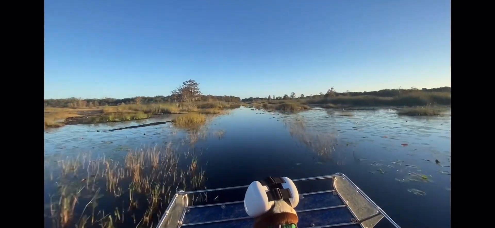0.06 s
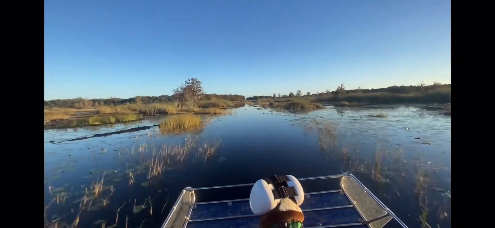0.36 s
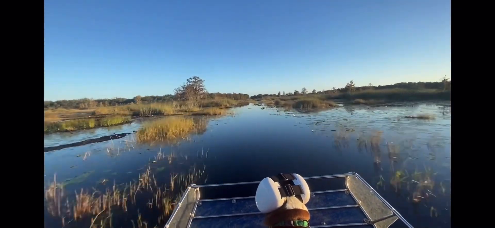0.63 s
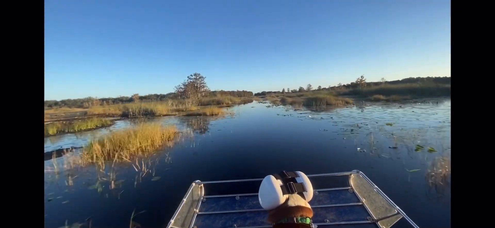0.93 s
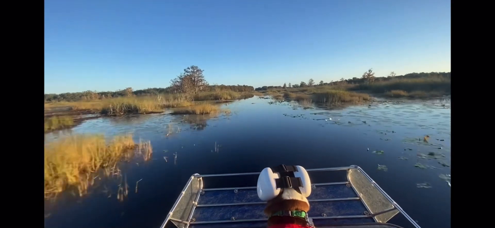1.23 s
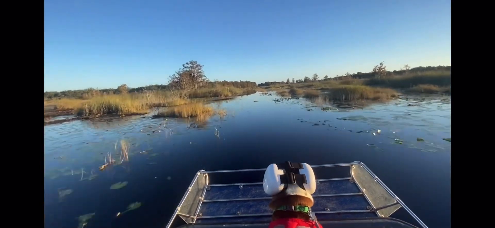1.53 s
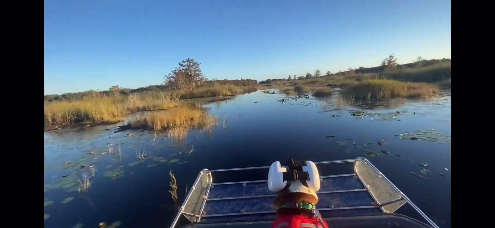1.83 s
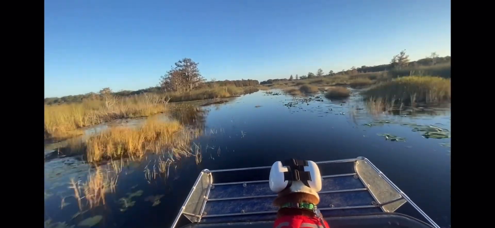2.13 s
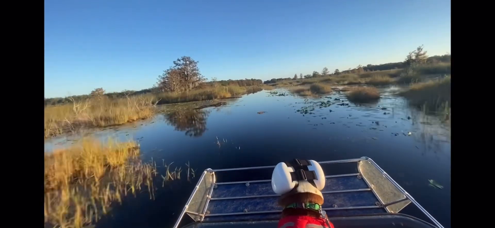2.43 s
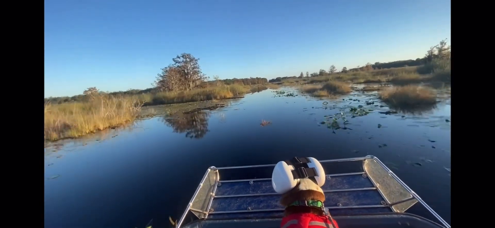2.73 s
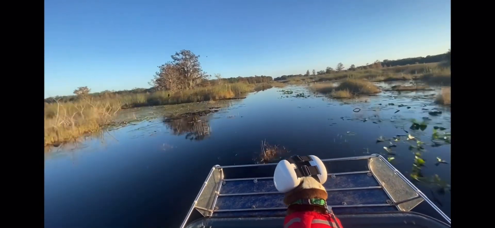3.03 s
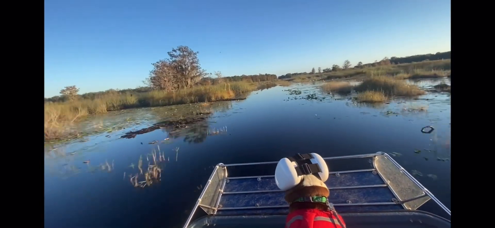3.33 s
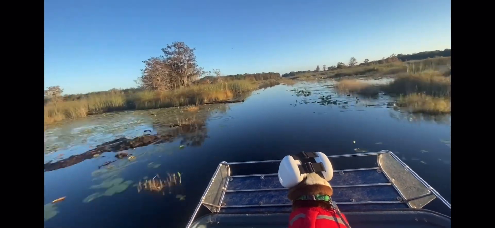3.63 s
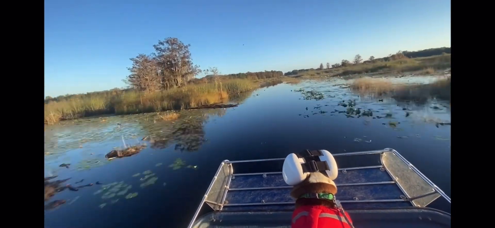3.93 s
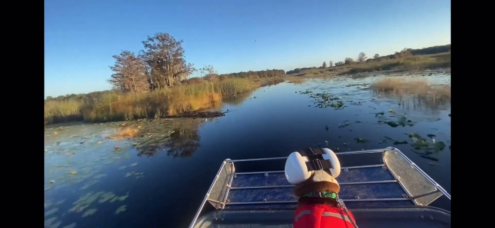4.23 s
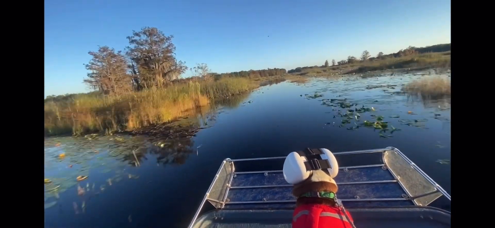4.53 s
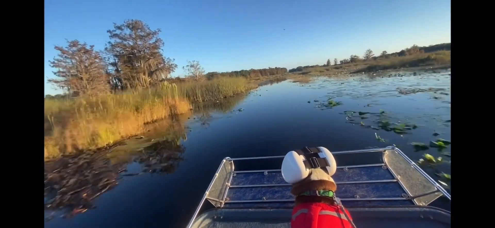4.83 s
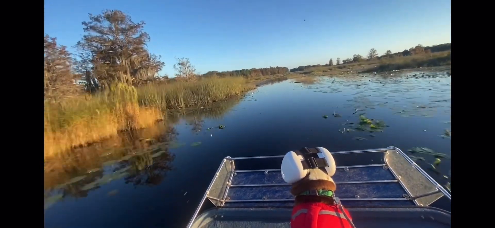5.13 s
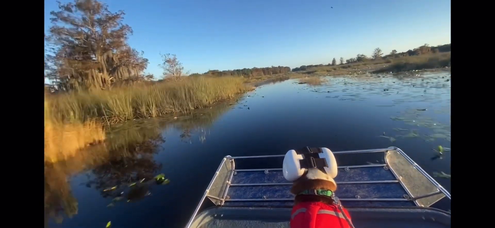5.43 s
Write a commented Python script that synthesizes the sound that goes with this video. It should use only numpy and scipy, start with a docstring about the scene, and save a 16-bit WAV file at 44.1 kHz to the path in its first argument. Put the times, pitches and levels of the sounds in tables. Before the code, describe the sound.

An airboat is already cruising over marsh water, heard close up from a seat on board. Its six-cylinder engine makes a loud, low, steady drone, with a rough growl and bark from open exhaust pipes above it. The propeller adds a pulsing roar of churned air and a faint high hiss of blade tips and spray. From the start until about 1 second, reeds brush along the hull with a light swish, then fade as the boat reaches open water. The engine runs on without a break, its pitch creeping up very slightly between about 0.7 and 4.8 seconds. The exhaust throbs unevenly, with small, brief surges around 1.5, 4.2 and 5 seconds. The overall loudness stays nearly constant, and the engine and propeller are still going at the end, at about 5.6 seconds.

```python
"""A six-cylinder engine drones and barks through open pipes while reeds brush along a hull:
an airboat cruising over marsh water, heard from a seat on board. The reeds fall away after
the first second; the throttle creeps up. The propeller's wash blurs the engine's upper
harmonics and adds a pulsing roar and a hiss."""
import sys
import numpy as np
from scipy import signal
from scipy.fft import rfft, irfft
from scipy.io import wavfile

SR = 44100
rng = np.random.default_rng(int(sys.argv[2]) if len(sys.argv) > 2 else 0)


def digitize_waveform(pressure):
    """Quantize a signal to 16-bit integers and store it at the path in sys.argv[1].

    Rows of a 2-D input are taken as channels; values are limited to [-1, 1].
    """
    field = np.atleast_2d(pressure).T
    bounded = np.clip(field, -1, 1)
    quanta = np.round(bounded * 32767).astype(np.int16)
    wavfile.write(sys.argv[1], SR, quanta)


N = 245637
TIME_S = np.arange(N) / SR
FREQ_HZ = np.fft.rfftfreq(N, 1 / SR)
CYLINDERS = 6
SKEW_RAD = 2.2  # common phase of the low lines: lopsided pressure pulses
GROWL_TOP_HZ, BARK_TOP_HZ = 700, 1050  # bands, low to high: growl, bark, rasp


def gain_of(db):
    """Decibels to amplitude."""
    return 10 ** (np.asarray(db) / 20)


def unit_rms(x):
    """Scales to an rms of one."""
    return x / np.sqrt(np.mean(abs(x) ** 2) + 1e-20)


def at_frequency(table, hz):
    """Columns of a spectrum at hz, interpolated in log frequency."""
    knots_hz, *columns = np.transpose(table)
    return np.array([np.interp(np.log(hz + 1), np.log(knots_hz + 1), c) for c in columns])


def over_time(table):
    """Columns of a time curve at every sample."""
    knots_s, *columns = np.transpose(table)
    return np.array([np.interp(TIME_S, knots_s, c) for c in columns])


def highpass(edge_hz, order=12):
    """High-pass magnitude response."""
    return 1 / np.sqrt(1 + (edge_hz / (FREQ_HZ + 1)) ** (2 * order))


def lowpass(edge_hz, order=12):
    """Low-pass magnitude response."""
    return 1 / np.sqrt(1 + (FREQ_HZ / edge_hz) ** (2 * order))


def eddies(width_hz, slowest_hz=0.01, size=4096):
    """Slow complex noise, rms one, mostly between slowest_hz and width_hz."""
    hz = np.fft.fftfreq(size, TIME_S[-1] / size)
    shape = abs(hz) / np.hypot(hz, slowest_hz) / (1 + (hz / width_hz) ** 2)
    white = rng.standard_normal(size) + 1j * rng.standard_normal(size)
    slow = unit_rms(np.fft.ifft(white * shape))
    return np.interp(TIME_S, np.linspace(0, TIME_S[-1], size), slow)


def wander(width_hz, slowest_hz=0.01):
    """Slow real noise, rms one."""
    return unit_rms(eddies(width_hz, slowest_hz).real)


# Likeness of the two sides: (frequency [Hz], coherence [0-1], left lead [rad])
STEREO_FIELD = [(30, 0.9, 2), (89, 0.6, 0.55), (145, 0.95, -2), (209, 0.93, 1.6), (308.6, 1, -1.5),
                (403, 0, 2), (480, 0.26, 3.5), (666, 0.66, 3.5), (738, 0.52, 2.0), (777, 0.1, 3),
                (806, 0.43, 4), (1226, 0.7, 4.5), (1540, 0.66, 3.5), (1900, 0.22, -0.5), (2960, 0.52, 4),
                (4500, 0.01, 0)]


def stereo_pair(a, b, hz):
    """Two unrelated complex signals become a partly coherent left and right."""
    coherence, lead_rad = at_frequency(STEREO_FIELD, hz)
    coherence = np.clip(coherence, 0, 1)
    left = coherence * a + np.sqrt(1 - coherence ** 2) * b
    return np.array([left * np.exp(1j * lead_rad), a])


def stereo_noise(spectrum, response):
    """Stereo noise of the given density, through a filter response."""
    a, b = rfft(rng.standard_normal((2, N))) * np.sqrt(SR / 2)
    density = gain_of(at_frequency(spectrum, FREQ_HZ))
    return irfft(stereo_pair(a, b, FREQ_HZ) * density * response, N)


# Engine speed: (time [s], firing rate [Hz])
FIRING_RATE = [(0, 90.78), (0.65, 90.99), (1.7, 92.06), (2.6, 92.61), (3.7, 92.71), (4.8, 93.14),
               (5.57, 92.98)]
MEAN_FIRING_HZ = over_time(FIRING_RATE).mean()


def firing_angle(wobble=0.0014, wobble_hz=7):
    """Phase in radians, one turn a firing; uneven combustion makes the speed hunt."""
    rate_hz = over_time(FIRING_RATE)[0] * (1 + wobble * wander(wobble_hz))
    return 2 * np.pi * np.cumsum(rate_hz) / SR


def throttle(db_per_hz):
    """Gain that follows the firing rate around its mean."""
    return gain_of(db_per_hz * (over_time(FIRING_RATE)[0] - MEAN_FIRING_HZ))


def puffing(angle, once, twice, phase_rad, loping=0.062):
    """Gain that pulses once and twice a firing and lopes every third firing."""
    pulses = once * np.cos(angle + phase_rad) + twice * np.cos(2 * angle)
    return unit_rms(1 + pulses + loping * np.cos(2 * angle / CYLINDERS))


def engine_line(angle, multiple, sides_db, flutter, flutter_hz):
    """One stereo partial; the higher it lies, the more it wavers in the moving air."""
    hz = multiple * MEAN_FIRING_HZ
    waver = unit_rms(1 + flutter * (hz / 400) * eddies(flutter_hz))
    _, lead_rad = at_frequency(STEREO_FIELD, hz)
    sides = np.array([np.exp(1j * lead_rad), 1]) * gain_of(sides_db)
    return np.sqrt(2) * (sides[:, None] * waver * np.exp(1j * angle)).real


# Firing harmonics 1, 2, 3 ...; speed slides each into or out of tune with pipes and hull:
# (left [dB], right [dB], skirt [dB], slope with firing rate [dB/Hz])
HARMONICS = [(-17.5, -11, -49, 3), (-25, -20, -52.5, 4.5), (-31.5, -28.5, -45, -0.5),
             (-27.5, -30, -37.5, 1.5), (-37.5, -42.5, -37.5, 0), (-39.5, -43, -47.5, 0),
             (-42, -43, -37.8, -0.3), (-37.5, -39.5, -36.5, 2.4), (-37, -38.5, -34, -0.4),
             (-47, -43, -36, 1.7), (-51, -46, -46.5, -1), (-53, -49, -44.5, -3.5),
             (-49.5, -53.5, -40.5, -3), (-43, -51, -38.5, 0), (-44.5, -52.5, -40, -2),
             (-45, -52.5, -43, 0.5)]
# Level offsets of the lowest harmonics: (time [s], first [dB], second [dB], third [dB], fourth [dB])
DRONE_OFFSETS = [(0.0, -0.7, -0.5, 1, 3), (0.1, -1.2, -4.5, -3, 2), (0.25, -1.2, -3, 1, -5),
                 (0.38, -0.5, -3, 2, 1), (0.5, -0.7, -6.5, 2, -0.5), (0.7, -1, -3.5, 2, -2.5),
                 (0.81, -0.5, -6.5, 2.5, 1), (0.92, -0.5, -3, 1, -1.5), (1.05, -0.5, -6, 3, 0.5),
                 (1.28, -0.8, -4.5, -2, -0.5), (1.41, 0, -3, 2, 3.5), (1.53, 0.3, -3.5, 1.5, -2.5),
                 (1.68, 0, -2.5, 1, -0.5), (1.85, 0.2, -4, -2, 1), (1.97, 0.5, -4, 0, -4),
                 (2.08, 0.5, -2.5, -1, 0.5), (2.35, -0.2, -1, -2.5, -0.5), (2.48, 0.6, -0.5, -4, 2),
                 (2.6, 0, -2.2, -3.5, 0.5), (2.79, 0.5, -1, -4, 1.5), (2.95, -0.1, 0.4, -3, 0),
                 (3.22, 0.6, -0.5, -1.5, -1), (3.34, -0.2, 0, -7, 0.7), (3.46, 0.2, 0.2, 0, 1),
                 (3.6, 0.3, -1, -1.5, -1.5), (3.92, -0.2, 1, -2.5, -4), (4.12, -0.2, -0.5, -8, -1),
                 (4.23, 0.3, 0, -3, -1), (4.55, 0, 0.2, -2.5, -1.5), (4.76, -0.5, 0, -3.5, 0.5),
                 (4.93, -0.1, 1.5, -2, -1), (5.05, 0.2, 0, -2.5, 1), (5.32, 0, -2, -0.5, 3),
                 (5.57, 0, -0.5, -3, 2.5)]
DRONE_HARMONICS = 4


def drone(angle):
    """Hum of the pipes: the lowest firing harmonics, each wavering in level."""
    hum = np.zeros((2, N))
    for k, (row, offset_db) in enumerate(zip(HARMONICS, over_time(DRONE_OFFSETS)), 1):
        line = engine_line(k * angle + SKEW_RAD, k, row[:2], flutter=0.12, flutter_hz=12)
        hum += gain_of(offset_db) * line
    return hum


def bark(angle, growl_gain, bark_gain, rasp_gain, line_trim_db=3.0, skirt_trim_db=-0.67):
    """Upper exhaust harmonics, plus the rough skirt the propeller's wash scatters around every one."""
    exhaust = np.zeros((2, N))
    for k, (*sides_db, skirt_db, db_per_hz) in enumerate(HARMONICS, 1):
        hz = k * MEAN_FIRING_HZ
        wash = [eddies(width_hz=17, slowest_hz=5) for _ in range(2)]
        skirt = (stereo_pair(*wash, hz) * np.exp(1j * k * angle)).real
        balance_db = np.subtract(sides_db, max(sides_db))
        band = np.sqrt(2) * gain_of(balance_db + skirt_db + skirt_trim_db)[:, None] * skirt
        if k > DRONE_HARMONICS:
            # Reflections from hull and cage leave these lines out of step and drifting.
            start_rad = 2 * np.pi * rng.random()
            drift_rad = 0.35 * hz / BARK_TOP_HZ * wander(width_hz=2.5)
            line = engine_line(k * angle + start_rad + drift_rad, k, sides_db, flutter=0.1, flutter_hz=3)
            band += gain_of(line_trim_db) * line
            band *= growl_gain if hz < GROWL_TOP_HZ else bark_gain if hz < BARK_TOP_HZ else rasp_gain
        exhaust += band * throttle(db_per_hz)
    eddy_gain = unit_rms(1 + 0.083 * wander(width_hz=18, slowest_hz=5))
    return exhaust * eddy_gain * puffing(angle, once=0.06, twice=0.097, phase_rad=1.0)


# Lines from unequal cylinders: (order [multiple of the engine's cycle rate])
LOPE_ORDERS = [3, 4, 5, 8, 9, 11, 15, 19, 21, 25, 27, 33]
# Their levels, one row an order: (left [dB], right [dB])
LOPE_LEVELS = [(-56.5, -53), (-46, -43.5), (-46.5, -44), (-46.5, -41.5), (-47, -37.5), (-48.5, -46.5),
               (-35, -31), (-44, -37), (-50, -55.5), (-60.5, -58), (-44.5, -48.5), (-49.5, -48)]


def lope(angle):
    """Weak lines off the firing harmonics: no two cylinders fire quite alike."""
    multiples = np.divide(LOPE_ORDERS, CYLINDERS)
    return sum(engine_line(k * angle + SKEW_RAD, k, sides_db, flutter=0.24, flutter_hz=9)
               for k, sides_db in zip(multiples, LOPE_LEVELS))


# Propeller and exhaust noise density before band gains: (frequency [Hz], left [dB], right [dB])
ROAR_SPECTRUM = [(20, -72, -73.5), (45.3, -63, -57), (74, -61, -53.5), (149, -58, -51.5), (215, -67, -52.5),
                 (260, -61, -55), (360, -58.5, -57), (475, -55.5, -56.5), (526, -61.5, -63.5),
                 (607, -53, -57.5), (780, -53, -57), (890, -56, -59), (977, -52.5, -57.5),
                 (1027, -57.5, -59.5), (1194, -52, -58.5), (1242, -48, -60.5), (1357, -52.5, -61.5),
                 (1436, -49, -67), (1510, -54, -70.5), (1600, -59.5, -62), (2130, -80, -76)]


def roar(angle, growl_gain, bark_gain, rasp_gain, split_hz=450, top_hz=2000, body_db=-4.5, rasp_db=-2.0):
    """Churned air: low buffeting under a body and a rasp that puff with the firings."""
    buffeting = stereo_noise(ROAR_SPECTRUM, lowpass(split_hz)) * throttle(db_per_hz=-1.5)
    growl_band = stereo_noise(ROAR_SPECTRUM, highpass(split_hz) * lowpass(GROWL_TOP_HZ)) * growl_gain
    bark_band = stereo_noise(ROAR_SPECTRUM, highpass(GROWL_TOP_HZ) * lowpass(BARK_TOP_HZ)) * bark_gain
    rasp_band = stereo_noise(ROAR_SPECTRUM, highpass(BARK_TOP_HZ) * lowpass(top_hz)) * rasp_gain
    body = (growl_band + bark_band) * puffing(angle, once=0.09, twice=0.061, phase_rad=1.0)
    rasp = rasp_band * puffing(angle, once=0.04, twice=0.14, phase_rad=0.96)
    return buffeting + gain_of(body_db) * body + gain_of(rasp_db) * rasp


# Blade-tip and spray noise density: (frequency [Hz], left [dB], right [dB])
HISS_SPECTRUM = [(1880, -77, -72.5), (2450, -77, -79), (2780, -69, -78), (3020, -69, -81.5),
                 (3254, -74.5, -82), (4730, -80, -87.5), (4770, -77, -86.5), (6240, -79.5, -85.5),
                 (7600, -90.5, -90.5), (8300, -90, -90), (9520, -93, -89), (10380, -114, -92.5),
                 (10920, -119, -97.5), (11600, -120, -108)]


def hiss(angle, low_hz=2000):
    """Blade tips and spray, faintly chopped and flickering, louder with speed."""
    chop = puffing(angle, once=0.065, twice=0.01, phase_rad=0.79, loping=0.02)
    flicker = 1 + 0.077 * wander(width_hz=22)
    return stereo_noise(HISS_SPECTRUM, highpass(low_hz)) * chop * flicker * throttle(db_per_hz=0.6)


# Reed noise density before the envelope: (frequency [Hz], left [dB], right [dB])
REED_SPECTRUM = [(1500, -80, -66.5), (2260, -72.5, -68), (3400, -86.5, -75), (6000, -78, -77.5),
                 (7500, -88, -90.5), (8400, -90.5, -78), (9500, -101, -94.5), (11000, -115, -100)]
# Reed contact with the hull: (time [s], relative level [dB])
REED_ENVELOPE = [(0, -4.5), (.42, -8), (.55, -9.5), (.85, -7.5), (1.05, -21), (1.7, -24.5), (5.57, -36.5)]


def reeds(low_hz=1500, trim_db=2.5):
    """Stems sweep the hull, fading as the boat reaches open water."""
    brushing = stereo_noise(REED_SPECTRUM, highpass(low_hz, order=3))
    return brushing * gain_of(over_time(REED_ENVELOPE) + trim_db)


# Exhaust surges and lulls: (centre time [s], half-width [s], growl [dB], bark [dB], rasp [dB])
EXHAUST_SURGES = [(0.02, 0.05, 2, -1, 1), (0.46, 0.026, -2, -3.5, -0.5), (0.61, 0.019, 3, 3.5, 2),
                  (0.75, 0.055, 1.5, -1, 1), (0.93, 0.06, -1, -4, 0), (1.19, 0.07, 1.5, -2.5, -2.5),
                  (1.54, 0.12, 2, 4, 0), (1.76, 0.031, 1.5, -5, 0), (1.87, 0.1, 1.5, 1.5, 1.5),
                  (2.04, 0.04, 2.5, 0.5, 0.5), (2.27, 0.098, -1, -1.5, -0.5), (2.46, 0.043, 1, -0.5, 1),
                  (2.63, 0.036, -1, 1.5, 1), (2.77, 0.056, -0.5, 3, 0.3), (2.93, 0.04, 0.5, 1.5, -1.5),
                  (3.04, 0.027, -1.5, -3, -2), (3.18, 0.065, -1.5, 3, -0.5), (3.56, 0.16, -1, -0.5, -0.5),
                  (3.76, 0.033, -3, 3, -2), (4.06, 0.093, -0.5, -1.5, 1), (4.23, 0.02, -4, 5.5, 2.5),
                  (4.31, 0.033, -1, -2.5, 0), (4.4, 0.038, 1, 3, 2.5), (4.66, 0.06, -0.5, 1.5, 0.5),
                  (5.03, 0.028, 5.5, 2.5, 2), (5.23, 0.06, 2, 0.5, 2), (5.4, 0.15, 2.5, 0.5, 0),
                  (5.55, 0.035, 3, 4.5, 1)]


def surges():
    """Growl, bark and rasp gains; each exhaust surge is a smooth bell in time."""
    bells_db = (np.outer(bands_db, np.exp(-((TIME_S - centre_s) / half_width_s) ** 2))
                for centre_s, half_width_s, *bands_db in EXHAUST_SURGES)
    return gain_of(sum(bells_db))


def throb(depth_db=0.6):
    """Gain that throbs unevenly as eddies pass through the propeller."""
    return gain_of(depth_db * wander(width_hz=12, slowest_hz=7))


def scene(hiss_surge_share=0.15):
    """One crankshaft times exhaust, roar and hiss, and the same surges lift them; reeds brush by."""
    angle = firing_angle()
    growl_surge, bark_surge, rasp_surge = surges()
    band_gains = throb() * np.array([growl_surge,
                                     bark_surge * throttle(db_per_hz=-0.6),
                                     rasp_surge * throttle(db_per_hz=0.75)])
    exhaust = drone(angle) + lope(angle) + bark(angle, *band_gains)
    propeller = roar(angle, *band_gains) + hiss(angle) * rasp_surge ** hiss_surge_share
    return exhaust + propeller + reeds()


def record(dry, cutoff_hz=12200):
    """Soft ends, then a steep low-pass."""
    faded = dry * signal.windows.tukey(N, 0.001)
    taps = signal.firwin(511, cutoff_hz, window=("kaiser", 9), fs=SR)
    return signal.oaconvolve(faded, taps[None], "same")


dry = scene()
out = record(dry)
digitize_waveform(out)
```